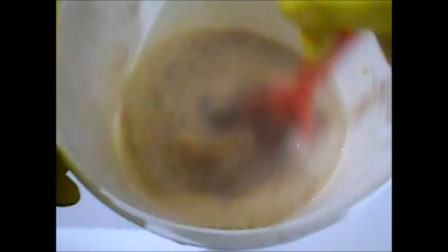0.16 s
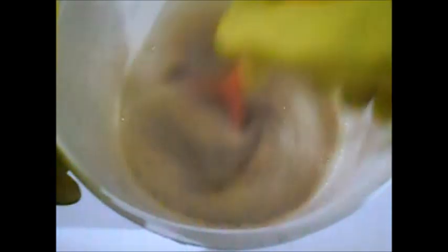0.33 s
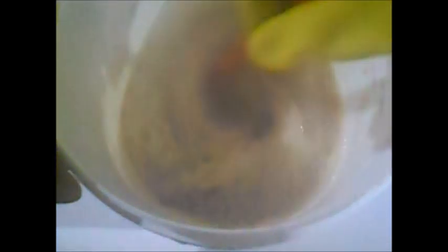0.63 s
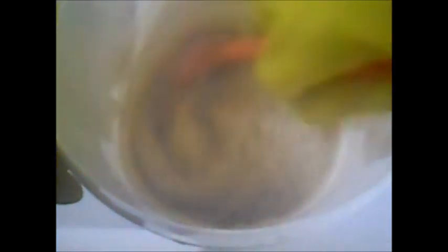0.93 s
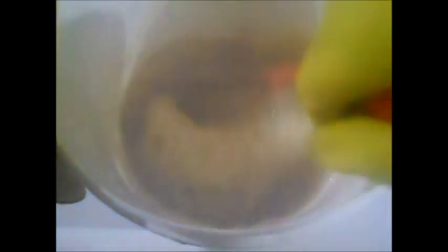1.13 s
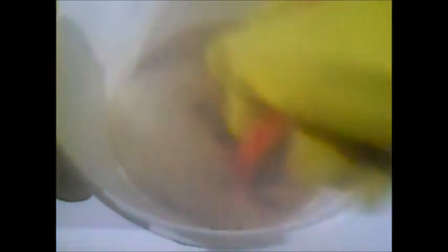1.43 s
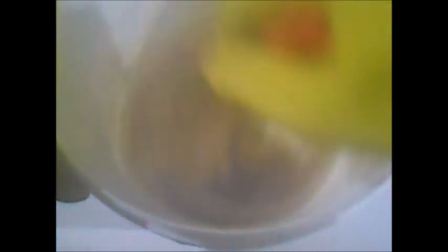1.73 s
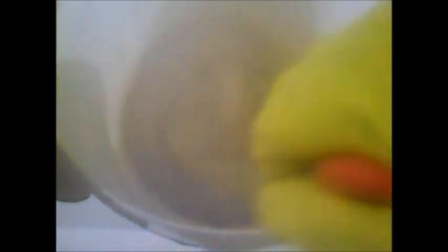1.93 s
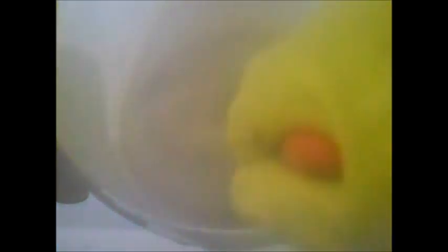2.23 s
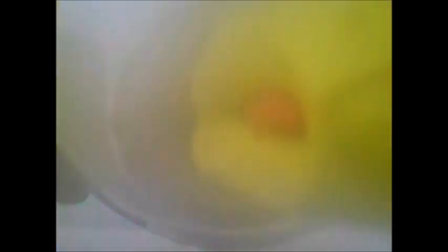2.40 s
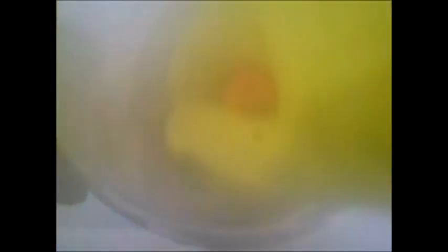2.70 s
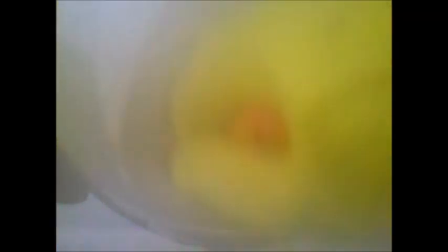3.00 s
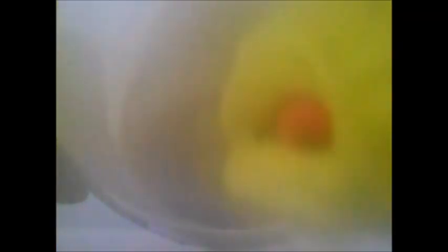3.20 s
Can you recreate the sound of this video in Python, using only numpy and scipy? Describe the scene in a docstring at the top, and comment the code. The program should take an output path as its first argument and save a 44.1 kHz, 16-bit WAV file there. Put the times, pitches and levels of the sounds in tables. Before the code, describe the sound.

A plastic spoon stirs gritty, sticky paste in a tub, rasping, knocking and popping up close

```python
"""A small kitchen: a plastic spoon stirs thick, gritty soap paste in a plastic tub, close to a mono microphone.
Each stroke drags grit along the wall, as random clicks that ring the tub and the air inside it.
The spoon knocks now and then with short damped modes; the paste ticks, snaps with bursts of noise,
pops with rising sines and gulps once with a falling one. One brief noisy chirp is made of random clicks
too. A low rumble and a faint hiss of shaped noise lie underneath."""
import sys
import numpy as np
from scipy import signal
from scipy.fft import rfft, irfft
from scipy.io import wavfile
from scipy.ndimage import uniform_filter1d

SR = 44100
rng = np.random.default_rng(int(sys.argv[2]) if len(sys.argv) > 2 else 0)


def generate_wav(sig):
    """Save sig (samples, or channels by samples) to the path in sys.argv[1] as 16-bit PCM at SR."""
    pcm = np.round(np.clip(np.atleast_2d(sig).T, -1, 1) * 32767).astype(np.int16)
    wavfile.write(sys.argv[1], SR, pcm)


N = 147735  # length in samples

# Colour of the coarse rasp and the wet ticks. Each row: frequency in Hz, gain in dB.
RASP_COLOUR = [(60, -4.5), (200, -10.5), (290, -10), (430, -4), (580, -6.5), (720, -1), (1000, -2),
               (1300, -2.5), (1750, -3.5), (2300, -7), (3200, -10.5), (5000, -17.5), (10500, -24.5)]
THUMP_HZ = 442  # boom of the air in the tub
CUTOFF_HZ = 10610  # upper limit of the recorder


def amp(db):
    """Decibels to gain."""
    return 10 ** (np.asarray(db) / 20)


def unit(x):
    """Scales to rms 1."""
    return x / np.sqrt(np.mean(x ** 2) + 1e-20)


def add(mix, start_s, sound):
    """Mixes a sound in at a time, cut at the end of the scene."""
    first = max(round(start_s * SR), 0)
    part = mix[first:][:len(sound)]
    part += sound[:len(part)]


def colour(x, points):
    """Filters by a spectrum of (Hz, dB) points, joined by straight lines over log frequency."""
    hz, db = np.transpose(points)
    f = np.fft.rfftfreq(len(x), 1 / SR)
    gain = amp(np.interp(np.log(f + 1), np.log(hz), db))
    return irfft(rfft(x) * gain, len(x))


def grains(per_s, spread_db, size):
    """Random clicks of either sign and uneven size."""
    strength = amp(spread_db * np.minimum(rng.exponential(1, size), 5))
    sign = rng.choice([-1, 1], size)
    happens = rng.random(size) < per_s / SR
    return strength * sign * happens


def echoes(x, t60, db, size=16384):
    """Adds a tail of random reflections that falls by 60 dB in t60 seconds."""
    t = np.arange(size) / SR
    decay = np.exp(-np.log(1000) * t / t60)
    tail = rng.standard_normal(size) * decay * (t > 1 / 1000)  # reflections start after 1 ms
    reflected = signal.fftconvolve(x, tail / np.linalg.norm(tail))[:len(x)]
    return x + amp(db) * reflected


def resonance(x, hz, width_hz):
    """One resonance of gain 1 at its peak."""
    b, a = signal.iirpeak(hz, hz / width_hz, SR)
    return signal.lfilter(b, a, x)


def tub(x, boom_db=0):
    """Adds the resonances of the tub and the air in it, all shifted in level by the boom."""
    # Each row: frequency in Hz, width in Hz, level in dB over the direct sound at a boom of 0 dB.
    tub_modes = [(338, 20, -2), (408, 36, 7), (455, 55, 2)]
    return x + sum(amp(db + boom_db) * resonance(x, hz, width) for hz, width, db in tub_modes)


def patchy(x):
    """Lifts and lowers short patches of the spectrum at random."""
    patch_hz, patch_s, patch_db = 500, 0.022, 4  # size of a patch, rms of its level
    window, hop = 256, 64  # samples
    z = signal.stft(x, nperseg=window, noverlap=window - hop)[2]
    bands, frames = max(round(patch_hz * window / SR), 1), max(round(patch_s * SR / hop), 1)
    field = uniform_filter1d(rng.standard_normal(z.shape), bands, axis=0)
    field = uniform_filter1d(field, frames, axis=1)
    patched = z * amp(patch_db * unit(field))
    return signal.istft(patched, nperseg=window, noverlap=window - hop)[1][:len(x)]


def rasp_and_hiss(length, attack, release, rasp_db, hiss_db, tilt_db, ring_hz, ring_db, boom_db, size=16384):
    """Fluttering clicks in two layers: a coarse ringing rasp, and a fine hiss loudest midway."""
    # Colour of the fine layer. Each row: frequency in Hz, gain in dB.
    hiss_colour = [(300, -3), (1200, -11), (2500, 4.5), (3700, 6), (5200, 0), (7500, -2), (9200, 2),
                   (11000, -5.5)]
    rasp_per_s, rasp_spread_db = 5000, 1
    hiss_per_s, hiss_spread_db = 19000, 5
    flutter_hz, flutter_db = 68.6, 1.74  # upper edge, rms
    ring_width_hz = 120
    walls_t60, walls_db = 0.029, -2  # short echoes, T60 in seconds
    hiss_at_ends_db = -8  # from midway to both ends

    t = np.arange(size) / SR
    length = max(length, 1 / 100)
    envelope = np.minimum(t / attack, 1) * np.exp(-np.maximum(t - length, 0) / release)
    arc = np.sin(np.pi * np.minimum(t / (length + release / 2), 1))
    slow_noise = colour(rng.standard_normal(size), [(flutter_hz, 0), (2 * flutter_hz, -60)])
    flutter = amp(flutter_db * unit(slow_noise))

    coarse = flutter * grains(rasp_per_s, rasp_spread_db, size)
    rasp = tub(colour(coarse, RASP_COLOUR), boom_db)
    rasp = rasp + amp(ring_db) * resonance(rasp, ring_hz, ring_width_hz)

    fine = flutter * grains(hiss_per_s, hiss_spread_db, size)
    hiss = patchy(colour(colour(fine, hiss_colour), [(4000, 0), (9000, tilt_db)]))

    rasp = unit(envelope * echoes(rasp, walls_t60, walls_db))
    hiss = unit(envelope * echoes(hiss, walls_t60, walls_db))
    hiss_gain = amp(hiss_db + hiss_at_ends_db * (1.5 - arc))
    sound = amp(rasp_db) * rasp + hiss_gain * hiss
    return sound * np.sqrt(np.mean(envelope ** 2))  # short bursts carry less energy


def background():
    """A steady low rumble and faint hiss: noise shaped by one spectrum."""
    # Each row: frequency in Hz, relative gain in dB.
    floor_colour = [(10, -3.5), (22, 1.5), (33, -2.5), (45, -6), (57, -3.5), (72, -15.5), (100, -18),
                    (150, -19.5), (260, -26.5), (400, -27.5), (600, -38), (1500, -40), (4000, -45),
                    (10500, -48.5)]
    floor_db = -41  # rms
    return amp(floor_db) * unit(colour(rng.standard_normal(N), floor_colour))


def squish():
    """Small wet ticks of the paste folding over: sparse clicks in the tub that swell and fade."""
    # Each row: time in seconds, level in dB.
    squish_levels = [(0, -62.5), (.3, -58), (.8, -54.5), (1.02, -70), (1.3, -60), (1.6, -54.5),
                     (1.78, -57.5), (1.9, -55.5), (2.05, -65.5), (3.35, -49.5)]
    per_s, spread_db = 500, 3
    clicks = colour(grains(per_s, spread_db, N), RASP_COLOUR)
    ticks = unit(tub(clicks, boom_db=7.0))
    seconds, db = np.transpose(squish_levels)
    return amp(np.interp(np.arange(N) / SR, seconds, db)) * ticks


def noisy_chirp(starts, ends, *settings):
    """A brief noisy chirp: a very short burst of rasp and hiss."""
    return rasp_and_hiss(ends - starts, *settings)


def gulp():
    """A growing pocket of air slides down in pitch, with the boom of the tub and a low push."""
    length_s, air_db, first_hz, last_hz = 0.027, -35, 916, 395
    roughness, boom_db = 0.72, -5.5  # boom relative to the sliding tone
    push_db, push_hz = -32.5, 86
    t = np.arange(0, length_s, 1 / SR)
    turns = np.cumsum(first_hz * (last_hz / first_hz) ** (t / length_s)) / SR
    wet = 1 + roughness * unit(uniform_filter1d(rng.standard_normal(len(t)), size=60))
    air = wet * np.sin(2 * np.pi * turns) + amp(boom_db) * np.sin(2 * np.pi * THUMP_HZ * t)
    push = np.sin(2 * np.pi * push_hz * t)
    swell = np.sin(np.pi * t / length_s)
    return swell * (amp(air_db) * air + amp(push_db) * push)


def snap(db, tilt_db, size=1024):
    """A thread of sticky paste breaks: a tiny burst of noise, tilted in dB per octave."""
    decay_s = 0.00053
    t = np.arange(size) / SR
    tilt = [(CUTOFF_HZ / 16, -4 * tilt_db), (CUTOFF_HZ, 0)]  # over the top four octaves
    burst = unit(colour(rng.standard_normal(size), tilt))
    return amp(db) * burst * np.exp(-t / decay_s)


def pop(db, hz, size=2048):
    """A bubble bursts open in the paste: a few cycles that rise in pitch."""
    decay_s, rise_per_s = 0.0018, 25  # rise as a share of the first pitch
    t = np.arange(size) / SR
    cycles = hz * (t + rise_per_s * t ** 2 / 2)
    ring = np.sin(2 * np.pi * cycles) * np.exp(-t / decay_s)
    return amp(db) * echoes(ring, t60=0.036, db=-8)


def knock(db, contact_hz, decay_s, thump_db, size=4096):
    """Spoon against tub: a clack of modes damped by the paste, and a thump of the air in the tub."""
    # Each row: multiple of the contact pitch, level in dB.
    contact_modes = [(.7, -6.5), (.87, -4.5), (1.08, -2.5), (1.27, -7), (2.1, -20.5)]
    thump_s = 0.0069  # decay
    t = np.arange(size) / SR
    clack = np.zeros(size)
    for i, (multiple, mode_db) in enumerate(contact_modes):
        sign = (-1) ** i  # neighbouring modes start in opposite directions
        clack += sign * amp(mode_db) * np.sin(2 * np.pi * multiple * contact_hz * t)
    thump = amp(thump_db) * np.sin(2 * np.pi * THUMP_HZ * t) * np.exp(-t / thump_s)
    return amp(db) * echoes(clack * np.exp(-t / decay_s) + thump, t60=0.12, db=-10.5)


def stroke(lands, lifts, *settings):
    """Grit dragged along the wall: a rasp while the spoon presses, a hiss where it is fastest."""
    # It flutters as the spoon catches and slips; the paste covers and bares the contact in patches
    return rasp_and_hiss(lifts - lands, *settings)


def scene():
    """All the stirring in a small kitchen, over the background; both channels alike."""
    # Sticky snaps of paste. Each row: start in seconds, level in dB, treble tilt in dB per octave.
    snap_rows = [(.023, -30.5, -2), (0.0933, -14.5, 5.5), (.231, -34, 0), (0.2355, -23.5, 6),
                 (0.242, -30.5, 2), (0.859, -35, -2), (1.217, -40.5, -4), (1.346, -31, -3.5),
                 (1.358, -29, -11), (1.667, -33.5, 0), (1.801, -28, -6.5), (2.0337, -28, 7),
                 (2.673, -29, -4), (2.996, -31, 18)]
    # Bubbles in the paste. Each row: start in seconds, level in dB, first pitch in Hz.
    pop_rows = [(.338, -39.5, 970), (0.361, -37, 980), (0.391, -34.5, 1310), (.874, -41, 1560),
                (0.92, -38.5, 1250), (1.027, -43, 1680), (1.128, -37.5, 1370), (1.164, -42, 1740),
                (1.219, -40.5, 1230), (1.799, -32, 1150)]
    # Spoon against the tub. Each row: start in seconds, level in dB, contact pitch in Hz,
    # its decay in seconds, thump in dB before the level is applied.
    knock_rows = [(.419, -27, 1520, 0.0021, -31), (.685, -23, 1260, 0.002, -11.5),
                  (1.3592, -23, 2260, 0.0014, -5.5), (2.002, -33, 1890, 0.0014, -8),
                  (2.0336, -15, 1950, 0.001, -11.5), (2.23, -25, 1500, 0.0015, -11),
                  (2.596, -20, 1184, 0.0039, -13.5), (3.043, -25.5, 1380, 0.0028, 0.5)]
    # Bursts of rasp and hiss. Each row: start, end, attack and release in seconds, rasp in dB,
    # hiss in dB before its arc, hiss tilt in dB from 4 to 9 kHz, ring in Hz, its level in dB, boom in dB.
    burst_rows = [(0.067, 0.198, .012, 0.037, -42, -43.5, -1, 1330, -3, -4),
                  (0.387, 0.41, 0.0032, .02, -46, -55, 0, 1350, -15, -7),
                  (0.417, 0.561, 0.013, 0.044, -39, -43.5, 0.5, 1320, 1.5, -1),
                  (0.607, 0.736, 0.032, 0.014, -45, -64, 11, 1300, -18, 6.5),
                  (0.762, 0.782, 0.011, 0.0055, -46.5, -45.5, -5, 1360, 6, 0),
                  (1.159, 1.168, 0.0033, .012, -55, -51, 0, 1860, 2, -4),
                  (1.364, 1.515, 0.0044, 0.072, -42.5, -43.5, -5, 1170, 4.5, 1.5),
                  (1.827, 1.869, 0.029, 0.011, -41.5, -39, -5.5, 1320, 5, -10),
                  (2.039, 2.061, 0.0045, 0.048, -46.5, -56, 14, 2300, -6, 14),
                  (2.112, 2.215, 0.0027, 0.024, -44.5, -49.5, 3, 1140, 4, 6),
                  (2.175, 2.292, 0.052, 0.04, -39.5, -37.5, -4.5, 1170, -6, 0.5),
                  (2.401, 2.445, 0.0033, 0.035, -45.5, -43.5, -1.5, 1310, 3, 1),
                  (2.45, 2.521, 0.025, .03, -41.5, -57, 0, 1333, 7, 6),
                  (2.504, 2.636, 0.052, 0.022, -37.5, -36.5, -7, 1250, -12, -8.5),
                  (2.638, 2.81, 0.0082, 0.036, -45, -49, -2, 1410, -8, -2),
                  (2.812, 2.927, .05, 0.047, -37.5, -40.5, 0, 1320, 4, 3.5),
                  (2.983, 3.027, 0.011, 0.016, -40.5, -49, 11, 1320, -10, 8),
                  (3.017, 3.062, 0.013, 0.034, -35, -44, -2, 1260, -12, 0.5),
                  (3.079, 3.168, 0.0053, 0.075, -42.5, -49, 0, 1340, -8, 2),
                  (3.154, 3.232, 0.015, 0.064, -36, -38, 4.5, 1330, 4.5, 1),
                  (3.266, 3.336, 0.065, 0.022, -41, -42.5, 1, 1320, -25, 7)]
    chirp_row = 4  # the noisy chirp; all other bursts are strokes of the spoon
    gulp_at_s = 1.797
    room_t60, room_db = .3, -14  # T60 in seconds

    mix = squish()
    add(mix, gulp_at_s, gulp())
    for source, rows in ((snap, snap_rows), (pop, pop_rows), (knock, knock_rows)):
        for start_s, *settings in rows:
            add(mix, start_s, source(*settings))
    for i, row in enumerate(burst_rows):
        burst = noisy_chirp(*row) if i == chirp_row else stroke(*row)
        add(mix, row[0], burst)
    mono = echoes(mix, room_t60, room_db) + background()
    return np.array([mono, mono])


def record(dry):
    """The recorder's band limit: a steep low-pass."""
    lowpass = signal.firwin(171, CUTOFF_HZ, window=("kaiser", 7), fs=SR)
    return signal.oaconvolve(dry, lowpass[None], "same")


dry = scene()
out = record(dry)
generate_wav(out)
```